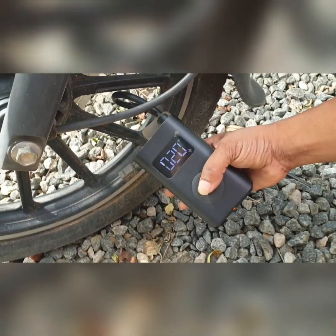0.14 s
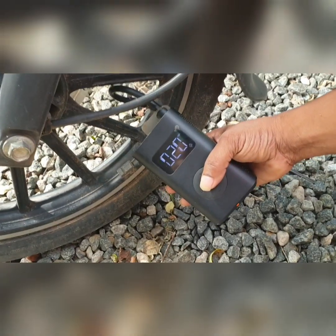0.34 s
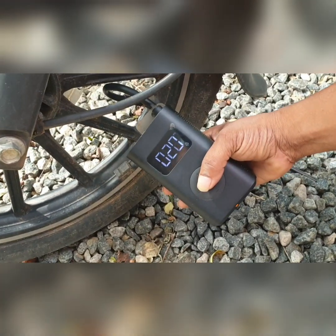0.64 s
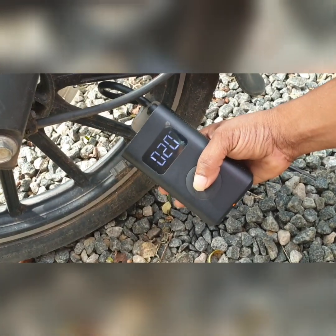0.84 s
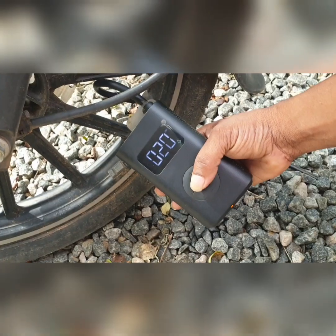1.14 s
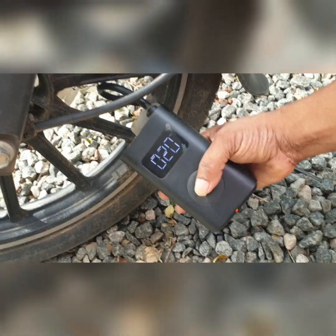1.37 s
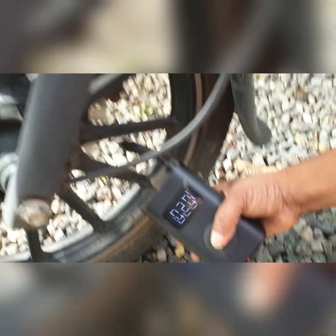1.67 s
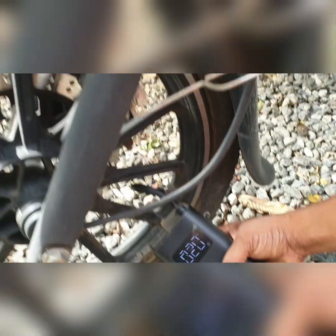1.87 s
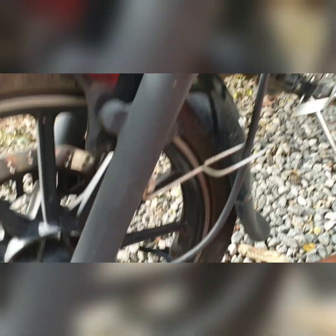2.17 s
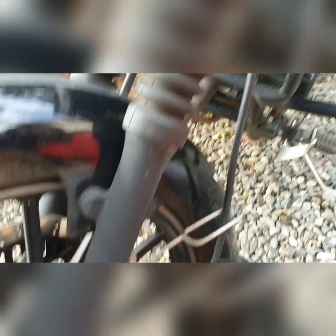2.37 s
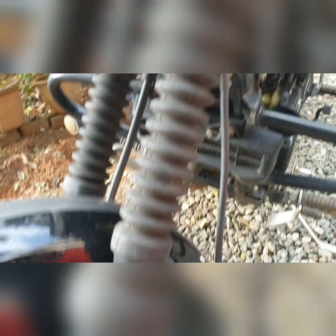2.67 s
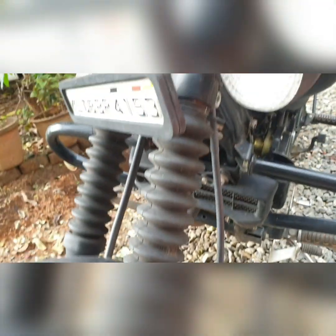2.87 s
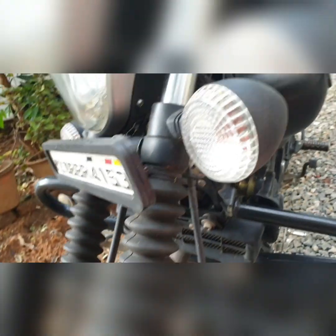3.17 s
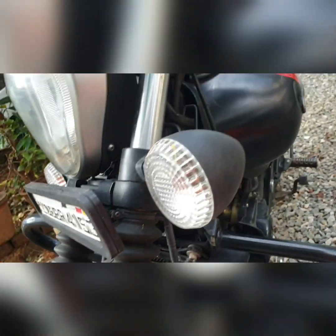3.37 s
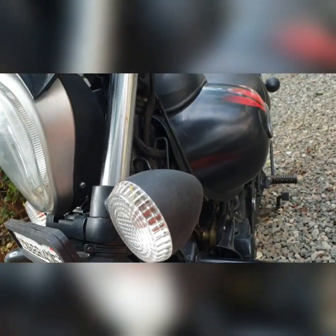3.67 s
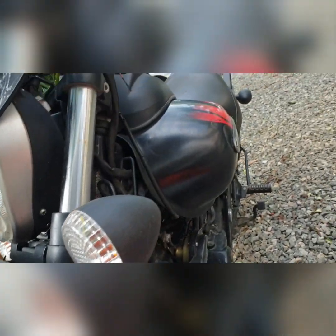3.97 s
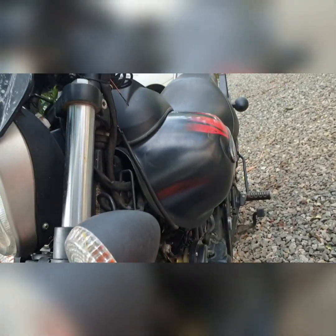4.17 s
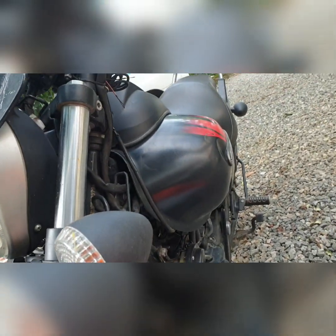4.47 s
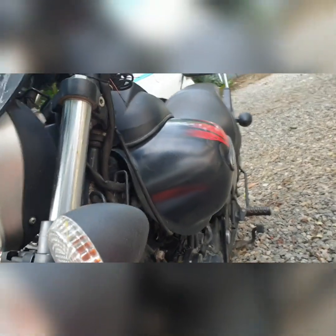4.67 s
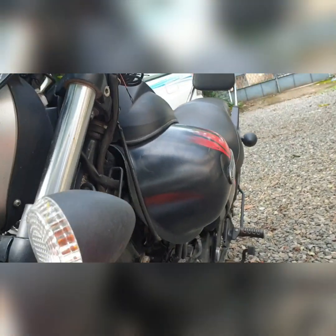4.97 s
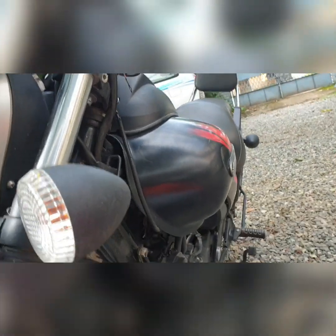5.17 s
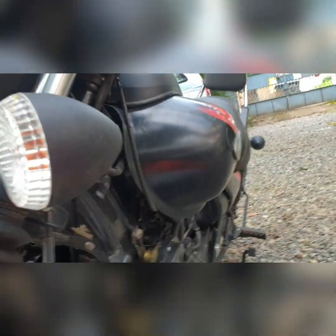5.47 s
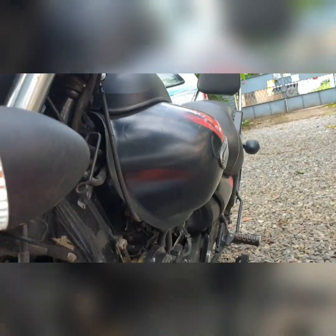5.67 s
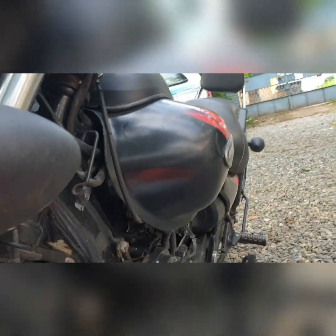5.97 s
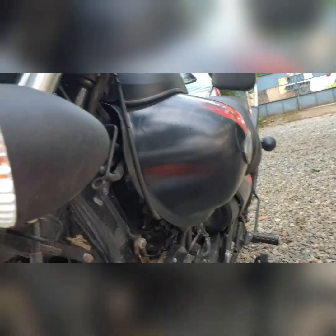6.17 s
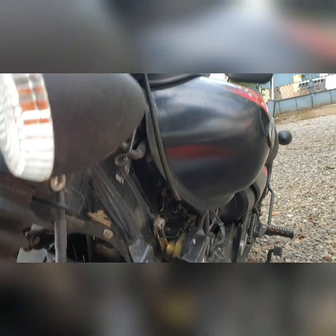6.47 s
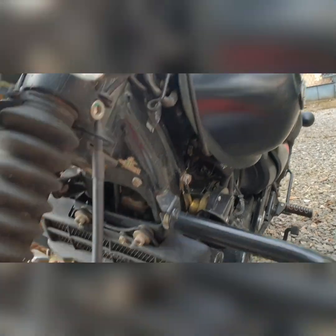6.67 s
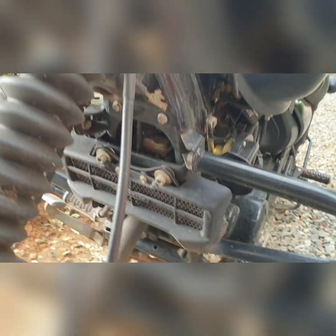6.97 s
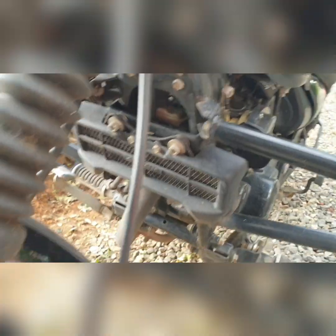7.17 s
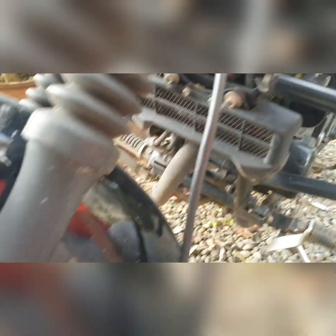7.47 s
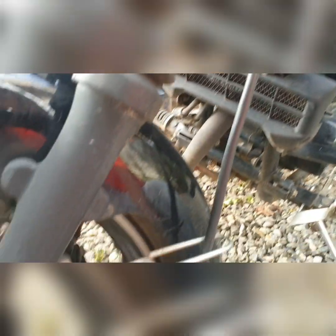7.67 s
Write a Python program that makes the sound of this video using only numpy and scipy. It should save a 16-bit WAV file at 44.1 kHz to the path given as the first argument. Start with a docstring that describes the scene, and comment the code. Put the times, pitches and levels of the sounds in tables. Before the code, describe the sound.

A small electric air pump buzzes and rattles fast and steadily outdoors, with hissing air, a motor whine and a low rumble beneath.

```python
"""A small battery air pump fills a motorcycle tyre outdoors, about 33 piston strokes a second over a low rumble.
Each turn the whine sags, the gears rattle, the inlet hisses, the outlet valve and piston knock and air rushes out.
The sounds are sine waves, noise that swells with the crank, and blows at set crank angles that ring the parts.
The microphone starts by the front wheel, rises past the mudguard to the tank, and at last comes partly back.
From about four seconds on, wind puffs and hand bumps reach the microphone, and later a faint hum comes and goes."""
import sys
import numpy as np
from scipy import signal
from scipy.fft import rfft, irfft, next_fast_len
from scipy.io import wavfile
from scipy.ndimage import map_coordinates

SR = 44100
rng = np.random.default_rng(int(sys.argv[2]) if len(sys.argv) > 2 else 0)


def store_wav(level_fs):
    """Save 16-bit WAV to argv[1]."""
    pcm = np.round(np.clip(np.atleast_2d(level_fs), -1, 1) * 32767)
    wavfile.write(sys.argv[1], SR, pcm.T.astype(np.int16))


N = 344862
TIME = np.arange(N) / SR  # seconds


def amp(db):
    """Turn decibels into a gain."""
    return 10 ** (np.asarray(db) / 20)


def unit(x):
    """Scale so that the mean of the channels has rms 1."""
    mono = np.atleast_2d(x).mean(0)
    return x / np.sqrt(np.mean(mono ** 2) + 1e-20)


def along(points, hz):
    """Read (Hz, value) points at any frequency, on a log axis."""
    f, v = np.transpose(points)
    return np.interp(np.log(hz + 1), np.log(f + 1), v)


def curves(rows):
    """Give one value per sample for each column after the time."""
    s, *columns = np.transpose(rows)
    return [np.interp(TIME, s, column) for column in columns]


def wobble(rate):
    """Join random values by a smooth curve, rate values a second."""
    knots = rng.standard_normal(int(N * rate / SR) + 4)
    return map_coordinates(knots, [TIME * rate], mode="nearest")


def swell(x, centre, width):
    """A bell-shaped rise and fall."""
    return np.exp(-.5 * ((x - centre) / width) ** 2)


def delayed(x, ms):
    """x heard after a delay that may change with time."""
    return map_coordinates(x, [np.arange(N) - ms * SR / 1000], order=3)


def filtered(x, response):
    """Multiply the spectrum of x by a response that depends on frequency."""
    m = 2 * next_fast_len(N // 2 + SR // 10)  # room for ringing after the end
    return irfft(rfft(x, m) * response(np.fft.rfftfreq(m, 1 / SR)), m)[..., :N]


def coloured(x, spectrum):
    """Shape x by (Hz, dB) points, with a filter that never rings ahead of its cause."""
    def response(hz):
        cepstrum = irfft(np.log(amp(along(spectrum, hz)) + 1e-6))
        half = len(cepstrum) // 2
        # fold the second half onto the first: minimum phase
        cepstrum[1:half] *= 2
        cepstrum[half + 1:] = 0
        return np.exp(rfft(cepstrum))
    return filtered(x, response)


def resonating(x, modes):
    """Ring x through (Hz, width in Hz, dB) resonances, with alternating signs."""
    def response(f):
        total = 0
        for k, (centre, width, db) in enumerate(modes):
            damping = 1j * f * width
            total = total + (-1) ** k * amp(db) * damping / (centre ** 2 - f ** 2 + damping)
        return total
    return filtered(x, response)


# How alike left and right are in the pump's noisy sounds.
# Each row: frequency in Hz, likeness from -1 (opposite) to 1 (the same).
LIKENESS = [(60, 1), (250, 1), (700, 0.72), (1400, 0.3), (3000, 0.54), (5000, -0.1), (7000, -0.17),
            (15000, 0.17)]


def spread(pair, alike):
    """Mix two unrelated signals into left and right with the given likeness."""
    def angle(hz):
        return np.arccos(np.clip(along(alike, hz), -1, 1)) / 2
    mid, side = filtered(pair, lambda hz: np.array([np.cos(angle(hz)), np.sin(angle(hz))]))
    return np.array([mid + side, mid - side])


def pan(db):
    """Left and right gains of mean 1 for a left-minus-right level difference."""
    gains = amp(np.array([db, -db]) / 2)
    return gains / gains.mean(0)


def blend(rows, places):
    """Mix the rows (wheel, mudguard, tank) by the microphone's share of each place."""
    return np.transpose(rows) @ places


def blows(turn, at, sizes, jitter_ms):
    """One impulse each time the crank passes one of the given angles, slightly mistimed."""
    passing_s = np.interp(at, turn, TIME, left=-1, right=-1)
    when = (passing_s + jitter_ms * 1e-3 * rng.standard_normal(len(at))) * SR
    inside = (when > 0) & (when < N - 2)
    whole, part = when[inside].astype(int), when[inside] % 1
    # share each blow between the two nearest samples
    early = np.bincount(whole, sizes[inside] * (1 - part), N)
    late = np.bincount(whole + 1, sizes[inside] * part, N)
    return early + late


def once_a_turn(turn, angle, jitter_ms, scatter_db):
    """One blow per stroke, each a little different."""
    at = np.arange(int(turn[-1]) + 1) + angle
    return blows(turn, at, amp(scatter_db * rng.standard_normal(len(at))), jitter_ms)


# The motor slows a little as it works.
# Each row: time in seconds, crank turns a second.
CRANK_SPEED = [(0, 33.439), (.7, 33.42), (2, 33.397), (5, 33.268), (7.82, 33.301)]
START_TURN, HUNT_TURN = .3134, .0012  # crank angle at the start, and size of its wander (turns)


def crank():
    """Add up the crank's speed into turns, with a slight wander."""
    speed, = curves(CRANK_SPEED)
    return START_TURN + np.cumsum(speed) / SR + HUNT_TURN * wobble(6)


# Where the microphone is.
# Each row: time in seconds, then the weights of wheel, mudguard and tank.
MICROPHONE_PATH = [(0, 0.85, 0.23, 0.13), (1.6, 1, 0.048, 0.13), (2.3, 0.18, 0.42, 0.077),
                   (3.1, 0.046, 0.49, 0.24), (3.7, 0.15, 0.15, 0.58), (6.5, 0.18, 0.12, 0.82),
                   (7.5, 0.43, 0.28, 0.74)]


def microphone_places():
    """Scale the three weights so that they add up to one at every moment."""
    weights = np.abs(curves(MICROPHONE_PATH))
    return weights / (weights.sum(0) + 1e-9)


# The phases of one turn that load the gears and move air: turn-round, intake, delivery, release, rest.
# Each row: centre in turns before the lag below, width in turns, gear load in dB, air flow in dB.
STROKE_PHASES = [(0, .035, 1.5, 1.5), (.22, .12, 4.5, 1.3), (.48, .052, 5.5, 5.5), (.62, .1, 1, 1),
                 (.89, .07, -2.5, -1.8)]
PHASE_LAG = .06  # each phase peaks this much later (turns)


def stroke(turn):
    """Add up how each phase of the turn changes gear load and air flow, in dB."""
    total = 0
    for centre, width, load_db, flow_db in STROKE_PHASES:
        shape = swell((turn - centre + .5) % 1, .5 + PHASE_LAG, width)
        total = total + np.outer([load_db, flow_db], shape)
    return total


# The tones of the motor's whine.
# Each row: multiple of motor speed, level in dB against the other tones, flare under rising load in dB.
WHINE_TONES = [(4, -12, 5), (12, -2.5, 3.5), (24, -11, 1), (36, -20.5, 14), (48, -28, 18)]
MOTOR_RATIO = 7.4  # motor turns per crank turn
# compression brakes the motor once a stroke
SPEED_RIPPLE, FASTEST_TURN = 0.034, 0.063  # share of its speed, and where it runs fastest (turns)


def whine(turn):
    """The motor sings; its pitch sags and recovers every turn, and its tones flare as the load builds."""
    sag = SPEED_RIPPLE / (2 * np.pi) * np.sin(2 * np.pi * (turn - FASTEST_TURN))
    shaft = MOTOR_RATIO * (turn + sag) + .003 * wobble(40) + .0015 * wobble(700)
    loading = swell((turn + .5) % 1, 0.817, 0.067)  # peaks at .317 turn
    total = 0
    for k, db, flare_db in WHINE_TONES:
        level = np.sqrt(2) * amp(db + flare_db * loading + 1.5 * wobble(5))
        total = total + level * np.sin(2 * np.pi * (round(k) * shaft + rng.random()))
    return total


def teeth(turn, steady, mesh, jitter_ms, count=90):
    """Gear teeth strike one by one: each has its own error, which returns every turn, plus loose play."""
    tooth = np.arange((int(turn[-1]) + 1) * count)
    steady = np.clip(steady, 0, 1)
    error = rng.standard_normal(count)[tooth % count]
    play = rng.standard_normal(len(tooth))
    sizes = mesh + np.sqrt(steady) * error + np.sqrt(1 - steady) * play
    return blows(turn, tooth / count, sizes, jitter_ms)


# What the pump's case passes of the gears, heard from the wheel, the mudguard and the tank.
# Each row: frequency in Hz, relative level in dB.
CASE_BY_WHEEL = [(650, -45.5), (1100, 6), (1190, -16), (1330, -17), (1550, 11.5), (1820, -2.5), (1990, -12),
                 (2160, 7), (2410, -9), (2580, 8.5), (2810, 0.5), (2960, -12), (3120, -20), (3200, 6.5),
                 (3800, -18), (4940, -40), (8360, -120)]
CASE_BY_MUDGUARD = [(650, -38), (1100, 5), (1180, -16), (1350, -8.5), (1520, 4), (1590, -4), (1670, -10.5),
                    (1850, -12.5), (1940, 2), (2170, -5), (2300, -4.5), (2770, -4.5), (3010, 4),
                    (3550, -8.5), (3800, -37), (4940, -25), (8360, -120)]
CASE_BY_TANK = [(700, -41.5), (1110, -17), (1190, -2.5), (1265, 0.5), (1400, -2.5), (1550, -7),
                (1670, -2.5), (1900, -9), (2220, -8.5), (2740, -3.5), (2960, -1), (3330, -1), (3600, -25),
                (3900, -12.5), (4940, -17.5), (8000, -120)]


def gears(contacts, places):
    """Blows ring the case, whose colour changes with the side it is heard from."""
    cases = (CASE_BY_WHEEL, CASE_BY_MUDGUARD, CASE_BY_TANK)
    return sum(share * unit(coloured(contacts, case)) for share, case in zip(places, cases))


# The case shaking with the crank.
# Each row: multiple of crank speed, usual level in dB rms.
CASE_SHAKE = [(2, -49), (3, -54), (4, -53), (6, -56), (8, -64.5), (10, -64), (13, -67)]


def shake(turn):
    """The unbalanced crank makes the case hum at multiples of its speed."""
    total = 0
    for k, db in CASE_SHAKE:
        level = np.sqrt(2) * amp(db + 1.6 * wobble(3.14))
        total = total + level * np.sin(2 * np.pi * (round(k) * turn + rng.random()))
    return total


# Air through the valves and vents, heard from the wheel and from the tank.
# Each row: frequency in Hz, relative level in dB.
AIR_BY_WHEEL = [(550, -14.5), (1200, -4.5), (2060, -5.5), (3500, -7), (3780, -2), (4240, -3.5),
                (4690, -0.5), (5600, -9.5), (6090, -3.5), (6570, -8), (7900, -10), (9400, -5.5),
                (10200, -8), (11100, -3.5), (12500, -5.5), (15100, -7), (16000, -22)]
AIR_BY_TANK = [(550, -39), (2060, -10), (3500, -6), (3750, -7), (4320, 0.5), (4560, 2), (5130, 0.5),
               (6120, -2.5), (7560, -4.5), (8630, -9.5), (9320, -3.5), (10300, -5.5), (12000, -0.5),
               (15100, -8.5), (16000, -10)]
# Extra path of the echo off the motorcycle; the rows are wheel, mudguard and tank.
# Each row: left delay in ms, right delay in ms.
AIR_ECHO_MS = [(1, 1.245), (1.3, 1.06), (1.95, 1.566)]
ECHO_SHARE = .2
TOP_PAN_DB = -4.5  # the highest hiss leans to the right
TOP_STEADY = .4  # share of the stroke's swell that the highest hiss does not follow


def air(flow_db, places, lift_db, treble_pan_db, body_pan_db):
    """Hiss swells with the air flow; the motorcycle echoes it and shades its top."""
    grit = amp(0.72 * wobble(1800))
    jet = spread(rng.standard_normal((2, N)), LIKENESS) * grit * amp(flow_db + 0.77 * wobble(70))
    echo = np.array([delayed(side, ms) for side, ms in zip(jet, blend(AIR_ECHO_MS, places))])
    jet = jet + ECHO_SHARE * echo
    by_tank = places[2]
    from_wheel = unit(coloured(jet, AIR_BY_WHEEL))
    from_tank = unit(coloured(jet, AIR_BY_TANK))
    hiss = unit((1 - by_tank) * from_wheel + by_tank * from_tank)
    top = filtered(hiss, lambda hz: 1 - 1 / (1 + (hz / 8200) ** 6))
    top_db = lift_db - TOP_STEADY * (flow_db - flow_db.mean())
    return (hiss - top) * pan(body_pan_db) + top * amp(top_db) * pan(treble_pan_db + TOP_PAN_DB)


# The inlet's hiss.
# Each row: frequency in Hz, relative level in dB.
INLET_COLOUR = [(3500, -24), (5200, -9), (6100, 2), (7000, -10), (8200, -14), (9400, -4.5), (10400, -15),
                (12000, -12), (16000, -24)]
# Level of the inlet's hiss in dB, from the wheel, the mudguard and the tank.
INLET_DB = [-12.5, -17, -17]
INTAKE_TURN, INTAKE_WIDTH = .19, .095  # peak and width of the suction (turns)


def intake(turn, places, bearing_db):
    """On the downstroke air is sucked through the narrow inlet: a bright hiss ahead of each knock."""
    suction = swell((turn - INTAKE_TURN + .5) % 1, .5, INTAKE_WIDTH)
    noise = spread(rng.standard_normal((2, N)), LIKENESS)
    hiss = unit(coloured(suction * noise, INLET_COLOUR))
    return amp(blend(INLET_DB, places)) * hiss * pan(.5 * bearing_db)


# Rumble of the open air, and buffeting of the microphone.
# Each row: frequency in Hz, relative level in dB.
RUMBLE_COLOUR = [(15, -35), (35, -10), (55, -20.5), (80, -3), (130, -5.5), (175, -8.5), (280, -13),
                 (370, -16), (520, -16.5), (700, -21), (1200, -120)]
BUFFET_COLOUR = [(14, -36), (25, -15), (35, 1), (46, -2.5), (75, -3), (200, -60)]
# The breeze picks up.
# Each row: time in seconds, buffeting in dB, rumble in dB.
BREEZE_LEVELS = [(0, -68, -48.5), (1.9, -65, -48.5), (2.9, -55, -49.5), (4.3, -46, -43), (5.3, -46, -43),
                 (6.4, -46, -45.5), (7.8, -46, -46)]
# Gusts that swell the rumble.
# Each row: time in seconds, half-length in seconds, rise in dB.
RUMBLE_GUSTS = [(1.2, .3, 3), (3.85, .2, 2), (4.7, .3, 1), (7.55, .3, 2.5)]
# Soft bumps of the hand that holds the microphone.
# Each row: start in seconds, size in dB before the softening.
HAND_BUMPS = [(4.681, -22), (5.521, -17), (5.658, -23)]
# The housing of the microphone knocks with each bump.
# Each row: frequency in Hz, width in Hz, level in dB against the bump.
HOUSING_MODES = [(250, 70, 3), (420, 110, 8)]


def outdoors():
    """Rumble of open air swells in gusts; the moving microphone is buffeted, and bumped by the hand."""
    buffet_db, rumble_db = curves(BREEZE_LEVELS)
    gust_db = sum(db * swell(TIME, s, width) for s, width, db in RUMBLE_GUSTS)
    alike = [(40, .93), (90, .84), (180, .72), (400, .7)]  # Hz, left-right likeness

    def noise(spectrum):
        return unit(coloured(spread(rng.standard_normal((2, N)), alike), spectrum))

    rumble = noise(RUMBLE_COLOUR) * amp(rumble_db + gust_db + .7 * wobble(18))
    buffet = noise(BUFFET_COLOUR) * amp(buffet_db + 1.6 * wobble(4))
    bumps = np.zeros(N)
    for s, db in HAND_BUMPS:
        u = np.maximum(TIME - s, 0) / .0012
        bumps += amp(db) * u * (2 - u) * np.exp(-u)  # a push and its slower return
    soft = filtered(bumps, lambda hz: 1 / (1 + 1j * hz / 1400) ** 2)  # a palm gives no click
    return (rumble + buffet + soft + resonating(soft, HOUSING_MODES)) * pan(0.41)[:, None]


# The cylinder and outlet cavity.
# Each row: frequency in Hz, width in Hz, then relative level in dB at the wheel, the mudguard and the tank.
CAVITY_MODES = [(815, 102, 9, -1, 3), (1020, 283, 0, -3, -3), (1234, 180, -10.5, -29, 0),
                (1525, 113, -6.5, -13, -6.5)]
# The valve's lift against its slap in dB, from the wheel, the mudguard and the tank.
VALVE_LIFT_DB = [-3, -4.5, -6.5]
VALVE_RATTLE_DB = -5  # gear rattle that reaches the cavity


def valve(turn, contacts, places):
    """The outlet valve lifts, then slaps shut, ringing the cavity; the gears shake it too."""
    lift = once_a_turn(turn, angle=.41, jitter_ms=.04, scatter_db=.6)
    slap = once_a_turn(turn, angle=.543, jitter_ms=.04, scatter_db=.6)
    pops = unit(amp(blend(VALVE_LIFT_DB, places)) * lift + slap)
    drive = pops + amp(VALVE_RATTLE_DB) * contacts
    modes = np.array(CAVITY_MODES)
    total = 0
    for share, db in zip(places, modes[:, 2:].T):
        total = total + share * unit(resonating(drive, np.c_[modes[:, :2], db]))
    return total


# The dull part of the piston's knock.
# Each row: frequency in Hz, relative level in dB.
THUD_COLOUR = [(60, -33.5), (150, -17), (270, -3), (360, -7), (430, 0.5), (490, 3), (540, 3.5), (610, 7),
               (700, -5), (800, 2), (1000, 5.5), (1150, -26), (1800, -21), (5000, -39)]


def thud(turn):
    """The piston thuds at both ends of its travel, harder at the top: a low buzz."""
    top = once_a_turn(turn, angle=.43, jitter_ms=.04, scatter_db=.9)
    bottom = once_a_turn(turn, angle=.93, jitter_ms=.02, scatter_db=.3)
    return unit(coloured(top + amp(-12.0) * bottom, THUD_COLOUR))


# What the connecting rod's crack rings.
# Each row: frequency in Hz, width in Hz, relative level in dB.
ROD_MODES = [(1546, 260, -2.5), (2230, 320, -0.5), (3000, 350, 2.5), (4600, 550, -3)]
CRACK_RATTLE_DB, CRACK_S = -4, .009  # the crack's loose share, and that share's time to fall 60 dB
CLICK_DB = -8.5  # the bare click against the ring


def crack(turn):
    """The connecting rod takes up its play: one hard, short crack a stroke with a bare click."""
    blow = once_a_turn(turn, angle=.432, jitter_ms=.035, scatter_db=.9)
    t = np.arange(SR // 100) / SR
    rattle = signal.fftconvolve(blow, amp(-60 * t / CRACK_S))[:N] * rng.standard_normal((2, N))
    loose = unit(spread(rattle, LIKENESS))
    ring = unit(resonating(unit(blow) + amp(CRACK_RATTLE_DB) * loose, ROD_MODES))
    # keep the click between about 900 and 8000 Hz
    click = unit(filtered(blow, lambda hz: 1j * hz / (900 + 1j * hz) / (1 + 1j * hz / 8000) ** 2))
    return -(ring + amp(CLICK_DB) * click)


def piston(turn):
    """The piston knocks as the load reverses at the top of the stroke, and rebounds."""
    knock = once_a_turn(turn, angle=.44, jitter_ms=.04, scatter_db=.8)
    rebound = once_a_turn(turn, angle=.5, jitter_ms=.08, scatter_db=1.2)
    return unit(knock + amp(-6) * rebound)


# The outlet valve's thin whistle.
# Each row: frequency in Hz, width in Hz, relative level in dB.
WHISTLE_MODES = [(8980, 720, 0)]


def whistle(turn):
    """Air whistles briefly each turn through the open outlet valve: noise through a narrow band."""
    burst = swell(turn % 1, 0.45, 0.033) * rng.standard_normal((2, N))
    return unit(resonating(burst, WHISTLE_MODES))


# Extra delay of the left side in ms, from the wheel, the mudguard and the tank.
LEFT_DELAY_MS = [-.05, -.015, 0]
LAG_MS_PER_DB = -.019  # the farther side hears the pump later, by its bearing


def side_lag(body, bearing_db, places):
    """Delay one side and advance the other by half the lag each."""
    lag_ms = LAG_MS_PER_DB * bearing_db + blend(LEFT_DELAY_MS, places)
    return np.array([delayed(body[0], lag_ms / 2), delayed(body[1], -lag_ms / 2)])


# Bands of the pump's sound that briefly swell or sink; one row lies past the end, unheard.
# Each row: time in seconds, half-length in seconds, frequency in Hz, width in Hz, change in dB.
PASSING_BANDS = [(0.9, .45, 3030, 170, 6), (1.1, 0.57, 1520, 170, 1.5), (1.9, 0.41, 3160, 260, 3),
                 (2.17, 0.25, 3970, 680, -5.5), (5, 0.69, 4430, 790, 4.5), (5.17, 1, 1380, 600, -3),
                 (4.87, 0.24, 3000, 170, 0.5), (5.5, 0.39, 2200, 450, 1.5), (6.3, 0.3, 820, 110, -6.5),
                 (6.1, .25, 1260, 180, 2), (23, 0.11, 6200, 820, -1), (6.7, .2, 9500, 600, 1.5),
                 (7.6, 0.29, 1360, 250, 2), (7.6, .4, 3460, 280, 2), (1.2, 0.34, 3220, 100, -9),
                 (1.9, 0.15, 8900, 900, 4), (2.88, 0.2, 3040, 210, -6), (2.4, 0.27, 7100, 1600, -1.5),
                 (2.9, 0.27, 15000, 1600, -2.5), (2.65, 0.27, 3300, 330, -1), (3.5, 0.4, 2650, 180, 1.5),
                 (3.3, .25, 1930, 180, -6.5), (3.7, 0.26, 9600, 1800, -1.5), (5.7, 0.28, 12000, 1800, -2.5),
                 (6.1, 0.17, 6300, 660, 0.5), (6.95, 0.79, 3000, 200, -2), (7.6, 0.34, 1020, 90, -4.5)]
GLANCE_SHARE, GLANCE_DRIFT_MS = .13, .12  # share of each faint echo, and how far its path drifts


def surroundings(x, count=4):
    """Fork, tank and engine give faint drifting treble echoes; bands of the sound briefly swell or sink."""
    treble = filtered(x, lambda hz: 1 - 1 / (1 + (hz / 2500) ** 4))
    paths_ms = np.linspace(.7, 2.2, count)

    def echo(side):
        return sum(delayed(side, ms + GLANCE_DRIFT_MS * wobble(1.3)) for ms in paths_ms)

    x = x + GLANCE_SHARE * np.array([echo(side) for side in treble])
    f, t, z = signal.stft(x, SR, nperseg=1024)
    band_db = 0
    for s, length, hz, width, db in PASSING_BANDS:
        band = 1 / (1 + (2 * (f - hz) / width) ** 2)
        band_db = band_db + db * np.outer(band, swell(t, s, length))
    return signal.istft(z * amp(band_db), SR, nperseg=1024)[1][:, :N]


# Low puffs of wind on the microphone.
# Each row: centre in seconds, frequency in Hz, height of the swell in dB.
WIND_PUFFS = [(4.11, 80, -35), (4.19, 110, -35), (4.27, 95, -33), (4.328, 141, -32), (4.44, 96, -35),
              (4.511, 135, -34), (4.662, 91, -34), (4.899, 80, -34), (5.051, 80, -32)]
PUFF_S = 0.0084  # half-length of a puff


def puffs():
    """Each puff is a cycle or two of low pressure waves."""
    total = 0
    for s, hz, db in WIND_PUFFS:
        wave = np.cos(2 * np.pi * (hz * (TIME - s) + rng.random()))
        total = total + amp(db) * swell(TIME, s, PUFF_S) * wave
    return total


# A faint low hum that comes and goes.
# The one row: centre in seconds, half-length in seconds, frequency in Hz, level at its height in dB rms.
FAINT_HUM = (5.85, .25, 269, -52)


def hum():
    """A low sine wave with a wandering phase swells briefly in the background."""
    s, width, hz, db = FAINT_HUM
    return np.sqrt(2) * amp(db) * swell(TIME, s, width) * np.sin(2 * np.pi * hz * TIME + wobble(9.3))


# The pump's loudness as the microphone comes and goes.
# Each row: time in seconds, level in dB.
PUMP_LOUDNESS = [(0, -29), (1.1, -28.5), (1.7, -29.5), (2.2, -30), (3, -30.5), (4.2, -32), (5.05, -30.5),
                 (5.65, -30.5), (6.4, -29.5), (7.05, -29), (7.6, -28)]
# Which side the pump is on, as the treble shows it.
# Each row: time in seconds, left minus right in dB.
PUMP_BEARING = [(0, -3), (1.6, -4.5), (2.3, -5), (3.1, -4), (4.1, -2), (5.1, 1.5), (5.7, 5.5), (6.6, 3),
                (7.8, 0.5)]
# The balance of the pump; the rows are wheel, mudguard and tank.
# Each row: valve, gears, whine, air and treble lift in dB, then the body's left minus right in dB.
PUMP_VIEWS = [(-6.5, -7, -11, -2, -6, 2.5), (-9.5, -4, -8.5, -4.5, -2, 1.5), (-9, -1, -7, -5, -7.5, 6.5)]
CASE_KNOCK_DB, CRACK_DB = -11, -13  # the knock in the case against the gears, and the rod's crack
THUD_DB, THUD_BY_WHEEL_DB = -6.5, -2  # the thud against the valve, and its change beside the wheel
WHISTLE_DB = -19.5  # the whistle against the air


def scene():
    """The crank drives every part of the pump; the microphone's place sets their balance."""
    turn = crank()
    places = microphone_places()
    loudness_db, = curves(PUMP_LOUDNESS)
    bearing_db, = curves(PUMP_BEARING)
    valve_db, gear_db, whine_db, air_db, lift_db, body_pan_db = blend(PUMP_VIEWS, places)
    load_db, flow_db = stroke(turn)

    mesh = np.array([teeth(turn, steady=0.48, mesh=0.11, jitter_ms=0.04) for _ in range(2)])
    contacts = unit(spread(amp(load_db) * mesh, LIKENESS))
    case_blows = contacts + amp(CASE_KNOCK_DB) * piston(turn)
    thud_db = THUD_DB + THUD_BY_WHEEL_DB * places[0]
    outlet = valve(turn, contacts, places) + amp(thud_db) * thud(turn)

    body = amp(whine_db) * whine(turn) + amp(gear_db) * gears(case_blows, places)
    body = body + amp(CRACK_DB) * crack(turn) + amp(valve_db) * outlet
    body = side_lag(body, bearing_db, places)

    rush = air(flow_db, places, lift_db, bearing_db, body_pan_db) + amp(WHISTLE_DB) * whistle(turn)
    hiss = amp(air_db) * rush + intake(turn, places, bearing_db)
    pump = amp(loudness_db) * surroundings(body * pan(body_pan_db) + hiss)
    drone = amp(loudness_db - loudness_db.mean()) * shake(turn)
    return pump + drone + outdoors() + puffs() + hum()


def record(dry):
    """Keep nothing from 15900 Hz up."""
    return filtered(dry, lambda hz: hz < 15900)


dry = scene()
out = record(dry)
store_wav(out)
```